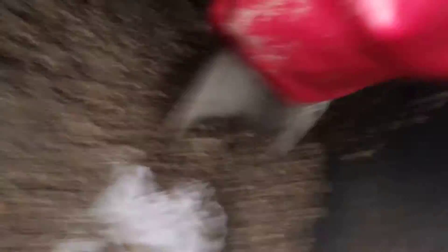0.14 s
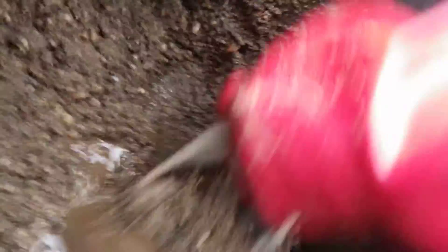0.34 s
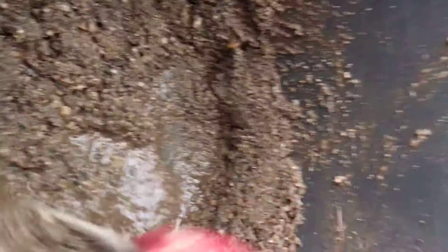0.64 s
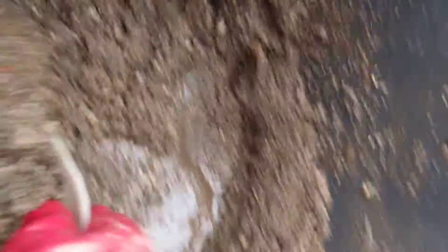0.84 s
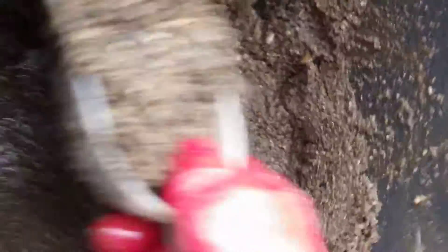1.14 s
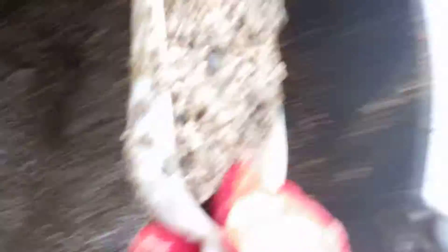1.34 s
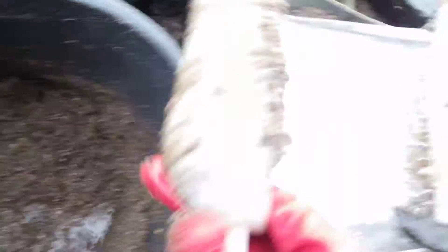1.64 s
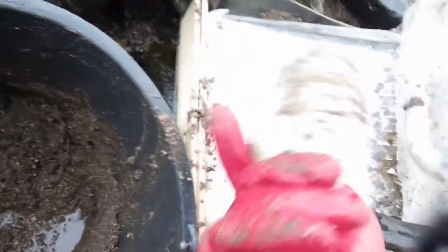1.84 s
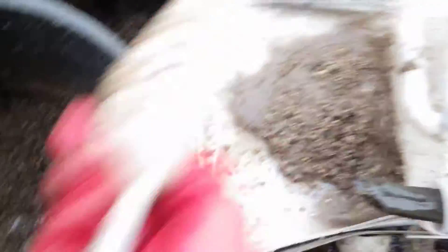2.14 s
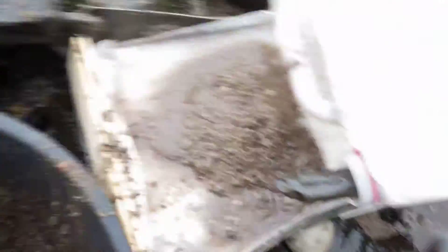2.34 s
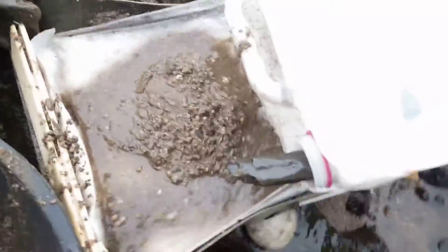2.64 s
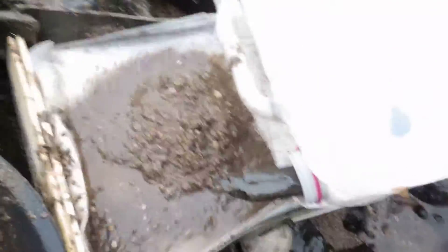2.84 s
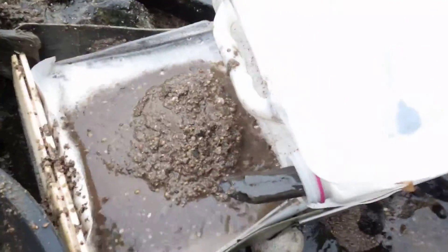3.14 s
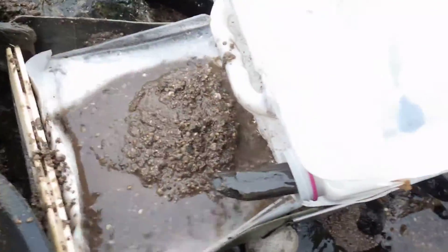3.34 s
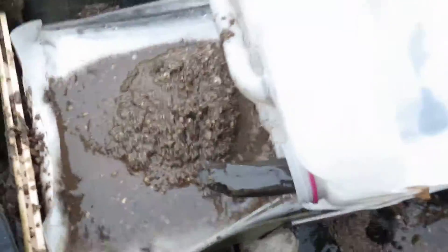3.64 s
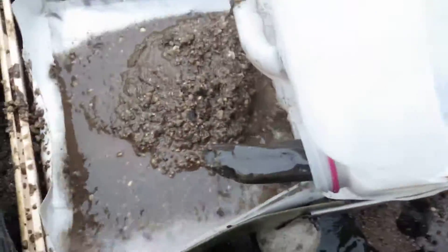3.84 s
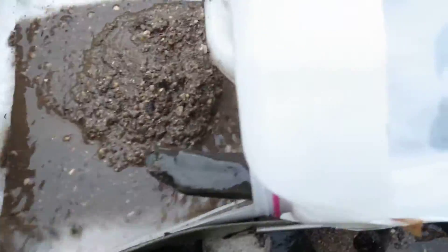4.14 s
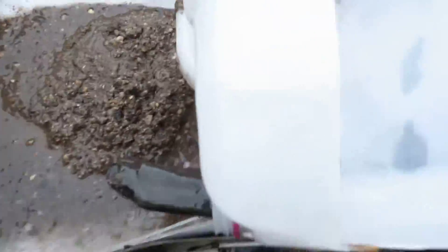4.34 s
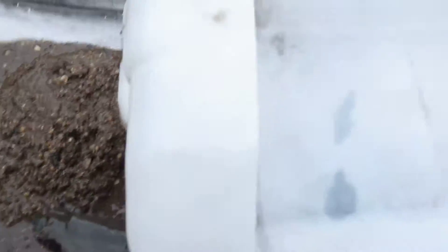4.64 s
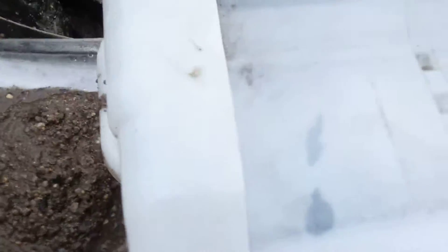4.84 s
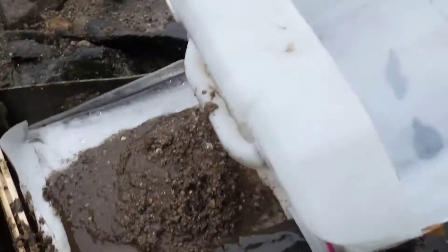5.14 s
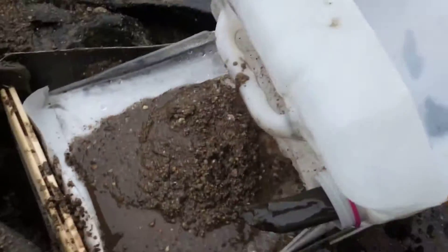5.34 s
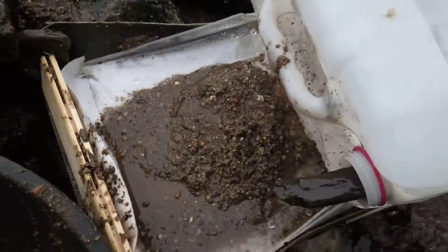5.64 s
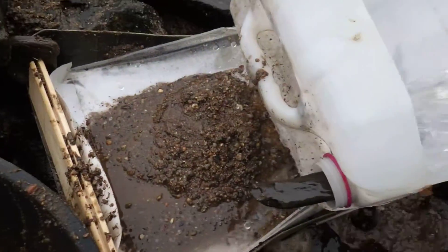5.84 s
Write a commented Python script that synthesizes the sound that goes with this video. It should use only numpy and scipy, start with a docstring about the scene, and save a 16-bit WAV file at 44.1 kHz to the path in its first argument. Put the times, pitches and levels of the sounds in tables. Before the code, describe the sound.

Gritty scraping and scooping of wet gravel against plastic, with hollow knocks, a sharp clack, handling rumble, then bubbling, crunchy wet grit.

```python
"""Outdoors, close by: a gloved hand scoops wet gravel from a tub into a plastic sluice as water trickles past.
Grit rasps as filtered random grains; stones and plastic knock as fading noise showers and ringing modes.
Single grains snap as tiny noise bursts, and bubbles in the wet heap ring with rising pitch.
The hand-held recorder rumbles and bumps in low noise and low rings, under a soft high hiss.
Its two close microphones sit in a resonant case, and notch filters, narrow and wide, follow them."""
import sys
import numpy as np
from scipy import signal
from scipy.io import wavfile

SR = 44100
rng = np.random.default_rng(int(sys.argv[2]) if len(sys.argv) > 2 else 0)


def master(y):
    """Save y as 16-bit WAV."""
    cut = np.clip(np.atleast_2d(y).T, -1, 1)
    pcm = np.round(cut * 32767)  # scale
    wavfile.write(sys.argv[1], SR, pcm.astype(np.int16))


N = 263718   # samples, about 6 s


def from_db(db):
    """Turn a level in dB into a gain."""
    return 10 ** (np.asarray(db) / 20)


def rms_one(x):
    """Scale each row to rms 1."""
    return x / np.sqrt(np.mean(x ** 2, axis=-1, keepdims=True) + 1e-20)


def in_time(rows):
    """Draw straight lines between the rows of a table, one curve per column after the time."""
    times_s, *columns = np.transpose(rows)
    now_s = np.arange(N) / SR
    return [np.interp(now_s, times_s, column) for column in columns]


def bandpass(x, low_hz, high_hz, order):
    """Keep the sound between two pitches (Butterworth filter)."""
    sos = signal.butter(order, [low_hz, high_hz], "band", fs=SR, output="sos")
    return signal.sosfilt(sos, x)


def band(x, low_hz, high_hz, order=3):
    """Band-pass, then scale to rms 1."""
    return rms_one(bandpass(x, low_hz, high_hz, order))


def resonate(x, hz, sharpness):
    """Pass a sound through one resonance with gain 1 at its peak."""
    return signal.lfilter(*signal.iirpeak(hz, sharpness, SR), x)


def drift(corner_hz):
    """Slow random wandering of rms 1: noise smoothed by two equal poles, one value per 40 samples."""
    pole = np.exp(-2 * np.pi * corner_hz * 40 / SR)
    noise = rng.standard_normal(N // 40 + 2002)
    slow = signal.lfilter([1], [1, -2 * pole, pole * pole], noise)[2000:]   # skip the start-up
    return np.interp(np.arange(N) / 40, np.arange(len(slow)), rms_one(slow))


def stereo(pair, side_db):
    """Make left and right from a shared row and a row that enters them with opposite signs."""
    shared, differing = pair
    return shared + from_db(side_db) * differing * [[1], [-1]]


def add(out, start_s, sound):
    """Mix a sound in at a time."""
    i = round(start_s * SR)
    out[..., i:i + sound.shape[-1]] += sound[..., :N - i]


def grains(per_s, spread_db, hiss):
    """Random contacts of very unequal size over a smooth hiss; both rows share times and sizes."""
    sizes = from_db(spread_db * np.minimum(rng.exponential(1, N), 4))
    sizes = sizes * (rng.random(N) < per_s / SR)
    return (rms_one(sizes) + hiss) * rng.standard_normal((2, N))


def ringing(hz, fade_s, rise):
    """A sine that falls 60 dB in fade_s, its pitch by then changed by the share 2 * rise; 0.25 s long."""
    t = np.arange(SR // 4) / SR
    return from_db(-60 * t / fade_s) * np.sin(2 * np.pi * hz * t * (1 + rise * t / fade_s))


# high hiss before its trim: time_s, level_db
HISS_LEVEL = [(0, -49), (.15, -66), (.36, -61), (.5, -58), (.64, -72), (1.3, -71), (2.0, -68), (2.6, -58),
              (2.68, -78), (3.2, -72), (3.8, -65.5), (4.6, -55), (5.0, -50), (5.5, -54), (5.98, -52)]


def hiss():
    """Smooth high noise, separate in each channel."""
    noise = band(rng.standard_normal((2, N)), 10400, 15300, order=2)
    return from_db(in_time(HISS_LEVEL)[0] - 1.0) * noise


# rumble of hand and wind on the case, before trims: time_s, level_db
RUMBLE_LEVEL = [(0.0, -30), (0.16, -47), (0.22, -26), (0.3, -34.5), (0.5, -36), (0.85, -50), (1.23, -44.5),
                (1.43, -56), (1.9, -47), (2.2, -35), (2.48, -34), (2.59, -24), (2.64, -57), (2.78, -45),
                (3.1, -57), (3.32, -53), (3.4, -36.5), (3.6, -47), (3.8, -49), (4.1, -35.5), (4.2, -41.5),
                (4.35, -35.5), (4.62, -26.5), (4.66, -30), (4.76, -32), (4.84, -24.5), (5.0, -35),
                (5.09, -29), (5.3, -35), (5.5, -35), (5.6, -21), (5.75, -26), (5.86, -34.5), (5.98, -30.5)]
# upper part of the rumble against its deep part, before trims: time_s, level_db
RUMBLE_UPPER = [(0, -1), (.5, 0.5), (1.15, 9), (1.9, -14.5), (2.5, -2.5), (3.06, 0.5), (3.45, -15.5),
                (4.25, -1), (4.7, -1.5), (5.5, -14), (5.63, -24), (5.98, -13)]


def rumble():
    """Lumpy low noise of hand and wind on the case, partly separate at each microphone."""
    level_db, = in_time(RUMBLE_LEVEL)
    upper_db, = in_time(RUMBLE_UPPER)
    deep_noise, upper_noise = rng.standard_normal((2, 2, N))
    lumps = from_db(2.5 * drift(23))
    deep = from_db(-3.0) * band(deep_noise, 30.7, 94, order=2)
    upper = from_db(upper_db - 5.0 + 4.2 * drift(8)) * band(upper_noise, 131.4, 271, order=2)
    return stereo((deep + upper) * from_db(level_db) * lumps, side_db=-7)


# fingers bump the case: time_s, level_db (before a random lean to one side), pitch_hz (at the start)
FINGER_BUMPS = [(0.213, -5.5, 120), (0.257, -16, 106), (0.3, -9.5, 144), (0.305, -12.5, 267),
                (0.409, -17, 210), (0.873, -19.5, 270), (1.029, -24, 203), (1.221, -14.5, 204),
                (1.235, -24, 110), (2.122, -22.5, 183), (2.18, -25, 168), (2.471, -14, 89),
                (2.509, -15.5, 147), (2.576, -10.5, 185), (2.587, -14, 95), (2.601, -13, 132),
                (2.647, -29, 236), (3.003, -33, 152), (3.058, -33.5, 230), (3.389, -26, 91),
                (3.57, -18, 221), (3.595, -25.5, 232), (3.624, -30, 178), (3.722, -16.5, 235),
                (3.754, -29, 328), (3.814, -25.5, 94), (4.062, -23, 103), (4.135, -29, 94),
                (4.201, -18, 200), (4.258, -11, 168), (4.306, -11.5, 183), (4.475, -19, 59.7),
                (4.625, -18, 265), (4.641, -15, 90), (4.656, -12, 64.4), (4.725, -21, 72),
                (4.808, -7.5, 109), (4.861, -16, 98), (5.053, -16.5, 94), (5.091, -8.5, 123),
                (5.231, -18, 134), (5.111, -12.5, 76), (5.581, -13, 93), (5.605, -12, 69)]


def bumps():
    """Each finger bump makes the case swing at a low, slightly falling pitch, louder on a random side."""
    out = np.zeros((2, N))
    for time_s, level_db, pitch_hz in FINGER_BUMPS:
        lean = from_db(rng.normal(0, 4) * np.array([[1], [-1]]))
        ring = ringing(pitch_hz, fade_s=0.059, rise=-0.054)
        start_s = time_s - 0.358 / pitch_hz   # start a part of a cycle early
        add(out, start_s, from_db(level_db) * lean * ring)
    return out


# pressure of the rasping grit, before trims: time_s, rasp_db, hollow_db (plastic and stones)
RASP_PRESSURE = [(0.0, -20.5, -23.5), (0.14, -32, -32.5), (0.27, -31.5, -30.5), (0.37, -28, -27.5),
                 (0.43, -18, -20.5), (0.52, -16.5, -18.5), (0.6, -19.5, -18), (0.64, -31, -29.5),
                 (0.8, -28.5, -23), (0.89, -32, -26.5), (0.96, -31, -24), (1.07, -34, -30.5),
                 (1.21, -35.5, -31), (1.33, -47.5, -55), (1.55, -46.5, -50), (1.99, -48.5, -50.5),
                 (2.1, -23, -28), (2.22, -33.5, -33), (2.3, -39.5, -44.5), (2.4, -39.5, -43),
                 (2.5, -30.5, -37), (2.62, -41.5, -42.5), (2.7, -52, -50.5), (2.84, -54.5, -55),
                 (2.91, -48, -44), (3.09, -52, -51.5), (3.52, -47, -52.5), (3.6, -44, -39),
                 (3.68, -47.5, -48), (3.73, -39, -32), (3.78, -45, -44.5), (3.89, -46.5, -46.5),
                 (4.4, -40.5, -41.5), (4.48, -34.5, -29.5), (4.84, -35.5, -36.5), (5.0, -26.5, -31.5),
                 (5.11, -29.5, -27.5), (5.21, -19, -30.5), (5.32, -30.5, -31), (5.44, -26.5, -36),
                 (5.49, -36, -46), (5.54, -28.5, -35.5), (5.64, -35, -42.5), (5.7, -22.5, -37.5),
                 (5.89, -40, -37.5), (5.98, -30.5, -37)]


def rasp_levels():
    """Rasp and hollow levels in dB, shared by the grit, the bubbles and the lesser blows."""
    return in_time(RASP_PRESSURE)


# bubbles that burst in the wet heap: start_s, level_db (before the swell), pitch_hz (at the start), fade_s
BUBBLES = [(0.597, -9, 930, 0.024), (0.709, -14, 604, 0.031), (0.821, -23, 617, 0.067),
           (4.682, -29, 1005, 0.031), (4.91, -16, 1370, 0.028), (4.996, -23, 985, 0.11),
           (5.067, -9.5, 700, 0.032), (5.154, -6.5, 1140, 0.031), (5.219, -17, 1140, 0.029),
           (5.283, -30, 1040, 0.032), (5.36, -15.5, 592, 0.047), (5.416, -16.5, 1290, 0.03),
           (5.448, -16.5, 900, 0.046), (5.524, -10.5, 1250, 0.027), (5.685, -18, 1190, 0.021)]
# lesser bubbles while water soaks the heap: from_s, to_s, level_db (against the hollow rasp), fade_s
SOAKING = (4.45, 5.75, 10, 0.026)
SMALL_BUBBLES = 70   # count


def pops():
    """A bubble near the surface swells for an instant and rings with rising pitch."""
    from_s, to_s, above_db, small_fade_s = SOAKING
    when, size, pitch = np.transpose(rng.random((SMALL_BUBBLES, 3)))
    start_s = from_s + when * (to_s - from_s)
    hollow_db = rasp_levels()[1][(start_s * SR).astype(int)]
    level_db = hollow_db + above_db + 10 * (size - .5)
    pitch_hz = 450 * 2 ** (1.71 * pitch)
    small = [(s, db, hz, small_fade_s) for s, db, hz in zip(start_s, level_db, pitch_hz)]
    out = np.zeros(N)
    for s, db, hz, fade_s in BUBBLES + small:
        ring = ringing(hz, fade_s, rise=0.21)
        swell = 1 - np.exp(-np.arange(len(ring)) / SR / 0.0027)
        add(out, s, from_db(db) * ring * swell)
    return out


STRAY_CEILING_DB = -30   # a rasp harder than this makes the lesser snaps and knocks no louder


def strays(count, above_db, spread_db):
    """Random times for lesser blows, with levels that follow the rasp up to a ceiling."""
    when, size = np.transpose(rng.random((count, 2)))
    start_s = .01 + when * (N / SR - .02)
    rasp_db = rasp_levels()[0][(start_s * SR).astype(int)]
    level_db = np.minimum(rasp_db, STRAY_CEILING_DB) + above_db + spread_db * (size - .5)
    return start_s, level_db


# the loudest single grains that snap, before trims: time_s, level_db, fine_db (top against the level)
SNAPS = [(0.0084, -3.5, -10), (0.026, -5.5, -20), (0.123, -13.5, 14.5), (0.2082, -23, 15),
         (0.2166, -2.5, -2), (0.228, -13, -12), (0.339, -13, -1), (0.4097, -8.5, -16), (0.419, -9, -23),
         (0.468, -20, 10), (0.474, -20, 6), (0.528, -16, 7), (0.59, -14, -9), (0.611, -20, 10),
         (1.2139, -22, -23), (1.2854, -28, -16), (1.403, -26, -17), (1.7664, -31, -21), (2.0803, -14, -26),
         (2.274, -27, -5), (2.3966, -19, -26), (2.419, -11.5, -22), (2.462, -7, -22), (2.4666, -22, 5),
         (2.484, -10, -18), (2.498, -10.5, 5), (2.513, -9, -5), (2.5542, -18, -16), (2.6052, 2, -23),
         (2.6076, -4, 4), (2.611, -20, -11), (2.617, -17, -24), (2.649, -26, -14), (2.8247, -32, -18),
         (3.4947, -29, -12), (3.555, -17, -19), (3.566, -6.5, -24), (3.7196, -19, -22), (4.203, -24, -21),
         (4.222, -21, -8), (4.255, -16.5, -21), (4.4223, -24, -17), (4.575, -18, -17), (4.717, -11.5, -23),
         (4.9831, 3, -31), (4.9966, -19, -4), (5.034, -3, -29), (5.078, -10, -21), (5.1412, -8.5, -10),
         (5.1929, 0.5, -32), (5.2382, -9.5, -16), (5.2876, -19, -2), (5.433, -17, -13), (5.5225, -16, -2),
         (5.5448, -10, -22), (5.6226, -10, -21), (5.7, -11, -4), (5.759, -3, -20), (5.777, -9, 2),
         (5.8231, -13.5, -5), (5.9585, -14, -24)]


def ticks():
    """A snap is a millisecond of noise: a sharp edge and a finer top that differs between the microphones."""
    edge, top = np.zeros((2, 2, N))
    fade = np.exp(-np.arange(SR // 200) / SR / 0.00077)
    lesser = strays(count=90, above_db=2, spread_db=16.0)
    for time_s, level_db, fine_db in SNAPS + [(s, db, -23) for s, db in zip(*lesser)]:
        pan_db = rng.normal(0, 4)   # left against right
        lean = from_db([[pan_db / 2], [-pan_db / 2]])
        snap = rms_one(rng.standard_normal((2, len(fade))) * fade)
        add(edge, time_s - .0006, from_db(level_db - 11.5) * lean * stereo(snap, side_db=-7))
        add(top, time_s - .0003, from_db(level_db + fine_db - 24.5) * lean * stereo(snap, side_db=4))
    # the tiny offset keeps the filters from slowing down on silence
    return bandpass(edge + 1e-18, 3300, 7300, order=2) + bandpass(top + 1e-18, 7800, 13000, order=2)


# knocks and crunches, before each part's trim and share of the fade:
# time_s, level_db, hollow_db (against the level), edge_db (against the level), pitch_hz, fade_s
MAIN_KNOCKS = [(0.122, 0, -9, -17.5, 627, 0.035), (0.207, -10, -10, -8.5, 565, 0.13),
               (0.285, -19, -19, -13, 697, 0.051), (0.339, -15.5, -5.5, -8, 1040, 0.037),
               (0.387, -11.5, -18, -11, 1210, 0.36), (0.684, -14.5, -15, -28, 884, 0.15),
               (0.821, -24.5, 3.5, -4.5, 635, 0.15), (0.942, -17.5, -5, -16, 1046, 0.15),
               (1.13, -17.5, -2.5, -33, 794, 0.063), (1.215, -5, -4.5, -24, 670, 0.026),
               (1.408, -20, -14.5, -15, 928, 0.072), (1.451, -19, -20, -16, 1390, 0.062),
               (1.468, -21, -22, -17, 1100, 0.14), (1.479, -12.5, -27, -22, 1210, 0.098),
               (1.521, -14, -14, -24, 1260, 0.026), (1.562, -24, -26, -17, 1025, 0.16),
               (1.685, -29, -10, -9, 1140, 0.06), (1.695, -17, -16.5, -16.5, 1300, 0.087),
               (1.764, -21.5, -18, -4, 1040, 0.04), (1.892, -25.5, -8.5, -10, 1060, 0.035),
               (2.081, -12.5, -14.5, -10, 497, 0.21), (2.153, -14, -15, -25, 1370, 0.19),
               (2.329, -19.5, -26, -6, 950, 0.065), (2.356, -18.5, -19, -4, 513, 0.088),
               (2.421, -14.5, -17, -5.5, 590, 0.052), (2.453, -19.5, -16.5, -6, 456, 0.18),
               (2.606, 0.5, -20, -7, 1230, 0.064), (2.642, -4, -6.5, -16, 884, 0.03),
               (2.646, -3.5, -7.5, -13, 635, 0.042), (2.739, -21, -7.5, -14.5, 630, 0.077),
               (2.816, -30, -26, -13, 563, 0.061), (2.879, -34, 2, -21, 1050, 0.056),
               (2.918, -26, -6, -23, 1380, 0.096), (2.994, -22.5, -6, -19, 1210, 0.053),
               (3.037, -29.5, 2.5, -24, 1100, 0.035), (3.4, -23.5, -13, -25, 1420, 0.033),
               (3.556, -8, -28, -19, 617, 0.065), (3.569, -9, -8.5, -26, 980, 0.13),
               (3.592, -23.5, -0.5, -25, 1047, 0.14), (3.72, -14, -9.5, -17, 984, 0.053),
               (3.726, -7, -6.5, -18.5, 1370, 0.054), (4.024, -26, -13, -24, 1100, 0.094),
               (4.196, -31.5, 4.5, -19, 980, 0.07), (4.246, -10.5, -0.5, -37, 1016, 0.05),
               (4.253, -10.5, -4.5, -30, 645, 0.078), (4.294, -23, 2.5, -27, 650, 0.056),
               (4.422, -20, -27, -16, 1180, 0.048), (4.463, -18.5, -13, -8.5, 1170, 0.27),
               (4.532, -18.5, -9.5, -23, 661, 0.25), (4.715, -19.5, -10.5, -19, 1060, 0.093),
               (4.895, -10.5, -30, -11, 1370, 0.046), (5.015, -9.5, -13, -15, 728, 0.19),
               (5.067, -15.5, -19, -0.5, 720, 0.1), (5.118, -24, -3.5, -22, 1210, 0.13),
               (5.153, -8, -10, -22, 1160, 0.074), (5.188, -7, -27, -16, 1100, 0.062),
               (5.287, -1.5, -30, -23, 1140, 0.032), (5.442, -7.5, -23, -26, 850, 0.053),
               (5.479, -5.5, -30, -17, 1370, 0.062), (5.536, -7.5, -26, -15, 784, 0.055),
               (5.618, -4.5, -35, -14.5, 1330, 0.1), (5.648, -7, -30, -16.5, 1320, 0.091),
               (5.709, -11, -19, -12, 1320, 0.058), (5.879, -13.5, -14.5, -12, 420, 0.083),
               (5.959, -4, -22, -4.5, 430, 0.029)]


def all_knocks():
    """The listed knocks and the lesser ones at random times."""
    start_s, level_db = strays(count=30, above_db=11, spread_db=10.0)
    pitch_hz = 560 * 2 ** (1.35 * rng.random(len(start_s)))
    lesser = [(s, db, -13.5, -15.5, hz, 0.055) for s, db, hz in zip(start_s, level_db, pitch_hz)]
    return MAIN_KNOCKS + lesser


# parts of a knock, low to high: low_hz, high_hz, trim_db, fade_share (times the knock's fade_s),
# side_db (left-right difference)
KNOCK_PARTS = [(223, 550, 0, 1.55, -50), (465, 1850, -7.5, 1.31, -59), (1720, 3550, -12.5, 0.72, -17.5),
               (3940, 6980, -4.5, 0.81, -10)]
THUD_DB = -10.5   # low thud against the hollow part, before the part's trim


def knocks(blows):
    """Each knock is a short dense shower of grains; treble dies sooner, the hollow plastic lasts."""
    shower = grains(5000, spread_db=2.5, hiss=0.56)
    t = np.arange(SR // 3) / SR
    build = 1 - np.exp(-t / 0.0016)
    out = 0
    for k, (low_hz, high_hz, trim_db, fade_share, side_db) in enumerate(KNOCK_PARTS):
        swell = np.zeros(N)
        for time_s, level_db, hollow_db, edge_db, pitch_hz, fade_s in blows:
            part_db = [hollow_db + THUD_DB, hollow_db, 0, edge_db][k]
            fading_db = level_db + trim_db + part_db - 60 * t / (fade_share * fade_s)
            add(swell, time_s - .001, from_db(fading_db) * build)
        out = out + stereo(swell * band(shower, low_hz, high_hz), side_db)
    return out


# modes of the plastic tray and scoop: pitch_hz, level_db (before each blow's strength), fade_s
TRAY_MODES = [(306, -9, 0.042), (635, -8, 0.079), (810, 0, 0.035), (1040, -8.5, 0.047),
              (1140, -10.5, 0.044), (1370, -4, 0.032), (1860, -12, 0.07), (2275, -7.5, 0.044),
              (2700, -12.5, 0.035), (2870, -19.5, 0.086), (3480, -22, .05)]
# the lifted scoop rings on faintly: start_s, level_db, pitch_hz, fade_s
LIFTED_SCOOP = (1.245, -43, 885, 0.3)
CONTACT_S = .0018   # time constant with which a blow builds


def clacks(blows):
    """The struck stone rings at its own pitch and strikes every mode of the tray with new strengths."""
    out = np.zeros(N)
    strengths = rng.normal(0, 0.96, (len(blows), len(TRAY_MODES)))   # dB
    modes = np.array([from_db(db) * ringing(hz, fade_s, rise=0) for hz, db, fade_s in TRAY_MODES])
    build = 1 - np.exp(-np.arange(modes.shape[1]) / SR / CONTACT_S)
    for (time_s, level_db, hollow_db, edge_db, pitch_hz, fade_s), strength_db in zip(blows, strengths):
        clack_db = level_db + hollow_db
        stone = from_db(clack_db - 4.5) * build * ringing(pitch_hz, 1.09 * fade_s, rise=0)
        tray = from_db(clack_db - 10.5 + strength_db) @ modes * build
        add(out, time_s, stone)
        add(out, time_s + 0.00097, tray)
    start_s, level_db, pitch_hz, fade_s = LIFTED_SCOOP
    add(out, start_s, from_db(level_db) * ringing(pitch_hz, fade_s, rise=0))
    return out


def pebbles(per_s, low_hz, high_hz, cycles):
    """Sparse contacts dealt to 14 small resonators spread in pitch, their sharpness 'cycles'; rms 1."""
    hits = grains(per_s, spread_db=4.0, hiss=0)
    dealt = rng.integers(0, 14, N)
    out = 0
    for k, hz in enumerate(np.geomspace(low_hz, high_hz, num=14)):
        out = out + resonate(hits * (dealt == k) + 1e-18, hz, cycles) / np.sqrt(hz)
    return rms_one(out)


# how bright the grit is, before trims: time_s, edge_db (sharp, against rasp), sand_db (fine, against rasp)
GRIT_BRIGHTNESS = [(0, -5, -21.5), (.6, -4.5, -23.5), (1.1, -8.5, -28.5), (1.4, -2.5, -16),
                   (2.0, -5.5, -18), (2.6, -2.5, -18), (3.1, -4, -20), (3.6, -5.5, -18), (4.5, -4, -16),
                   (4.85, -1, -24), (5.15, -4, -20), (5.6, -1.5, -9), (5.98, -2, -11)]
# parts of the rasp (hollow, rasp, edge, sand): low_hz, high_hz, trim_db, side_db (left-right difference)
RASP_PARTS = [(491, 1925, -6.5, -54), (1667, 3870, -4.5, -19), (3870, 6800, -5.5, -9.5),
              (7700, 9870, -4.5, 2)]


def grit():
    """One stream of grains rasps on plastic, stone and sand, split into four bands that waver in level."""
    rasp_db, hollow_db = rasp_levels()
    edge_db, sand_db = rasp_db + in_time(GRIT_BRIGHTNESS)
    stream = grains(1500, spread_db=2.0, hiss=1.0) * from_db(0.91 * drift(43))
    out = 0
    levels = [hollow_db, rasp_db, edge_db, sand_db]
    for level_db, (low_hz, high_hz, trim_db, side_db) in zip(levels, RASP_PARTS):
        gain = from_db(level_db + trim_db + 2.2 * drift(26))
        out = out + stereo(gain * band(stream, low_hz, high_hz), side_db)
    # larger stones and small bubbles ring for some cycles
    out = out + from_db(hollow_db - 15.0) * pebbles(1400, 538.4, 1720, cycles=33.0)[0]
    out = out + from_db(rasp_db - 11.0) * pebbles(2200, 1720, 3820, cycles=38.0)[0]
    sharp = from_db(edge_db - 13) * pebbles(500, 4520, 6770, cycles=130.0)
    return out + stereo(sharp, side_db=-12.0)


def scene():
    """Add all the sources, close to the microphones and in the open, with no echo."""
    blows = all_knocks()
    background = hiss() + rumble() + bumps()
    return background + pops() + ticks() + knocks(blows) + clacks(blows) + grit()


# where the two microphone ports ring unlike: pitch_hz, width_hz, level_db (on the slope of the sound)
PORT_RINGS = [(4670, 100, -0.5), (9650, 2400, -19)]
# resonances of the case: pitch_hz, width_hz, boost_db (each at its own peak)
CASE_RINGS = [(702, 200, 1), (1100, 590, 2), (2635, 1180, 11.5), (5180, 1220, 6)]
# notch filters, narrow and wide: pitch_hz, width_hz
NOTCH_FILTERS = [(1602, 434), (2078, 410), (3185, 624), (4150, 1740), (4215, 247), (7865, 390)]
CUTOFF_HZ = 16300


def record(dry):
    """Port and case resonances, notch filters, hard ceiling, steep top cut."""
    mid, side = (dry[0] + dry[1]) / 2, (dry[0] - dry[1]) / 2
    # the left-right difference is weak in the middle frequencies
    stop = signal.butter(3, [900, 2400], "bandstop", fs=SR, output="sos")
    side = signal.sosfilt(stop, side)
    slope = np.gradient(mid)   # change per sample
    for hz, width_hz, db in PORT_RINGS:
        side = side + from_db(db) * resonate(slope, hz, hz / width_hz)
    x = np.array([mid + side, mid - side])
    for hz, width_hz, db in CASE_RINGS:
        x = x + (from_db(db) - 1) * resonate(x, hz, hz / width_hz)
    for hz, width_hz in NOTCH_FILTERS:
        x = signal.lfilter(*signal.iirnotch(hz, hz / width_hz, SR), x)
    limited = np.clip(x, -1, 1)
    top_cut = signal.ellip(12, .5, 90, CUTOFF_HZ, fs=SR, output="sos")
    return signal.sosfilt(top_cut, limited)


dry = scene()
out = record(dry)
master(out)
```